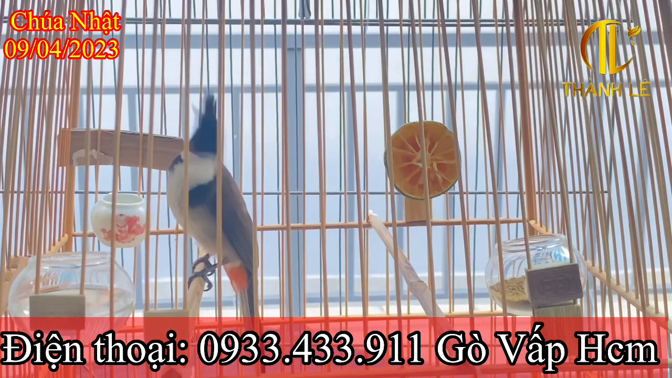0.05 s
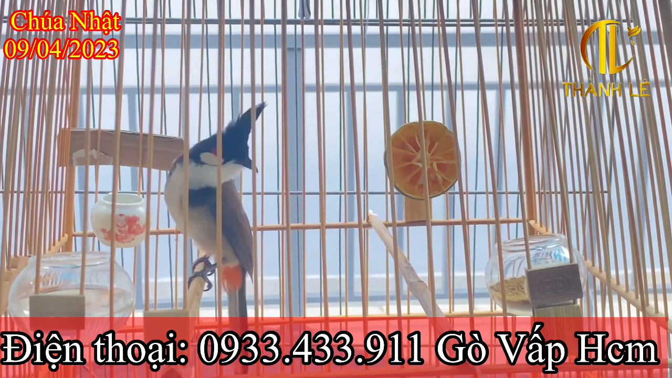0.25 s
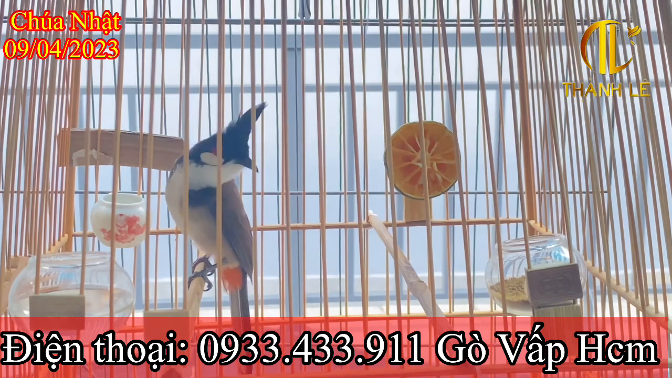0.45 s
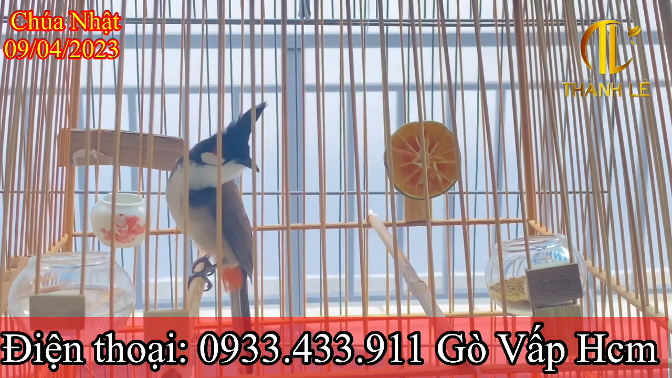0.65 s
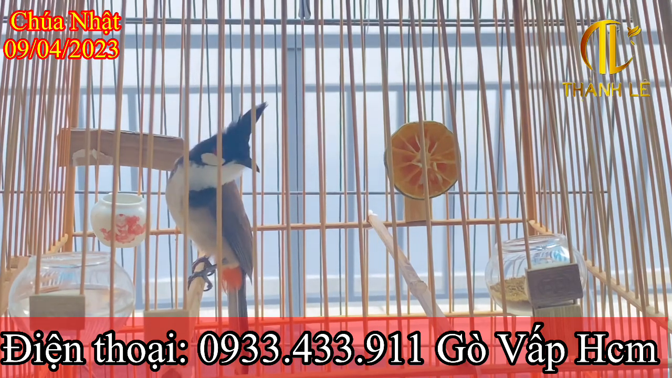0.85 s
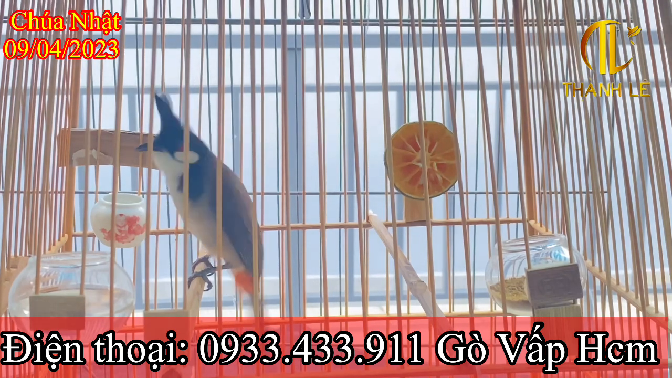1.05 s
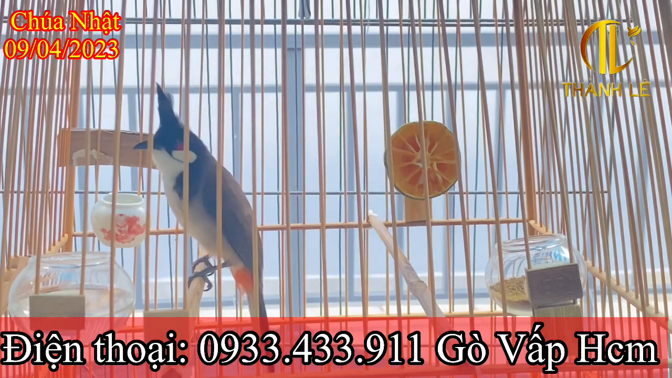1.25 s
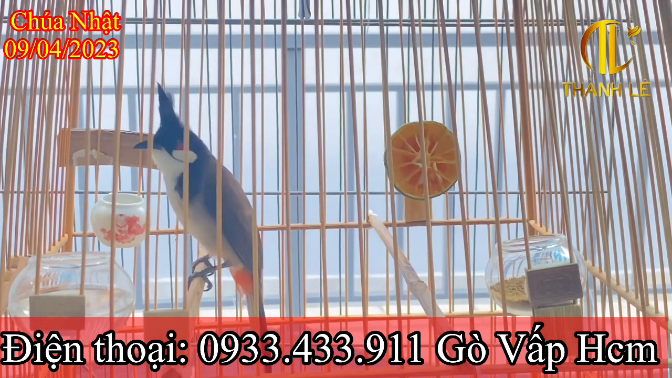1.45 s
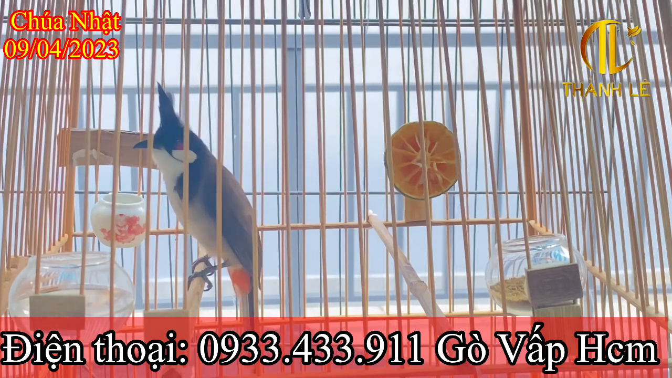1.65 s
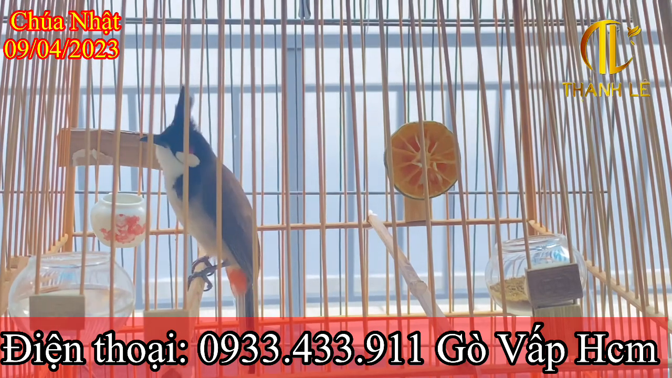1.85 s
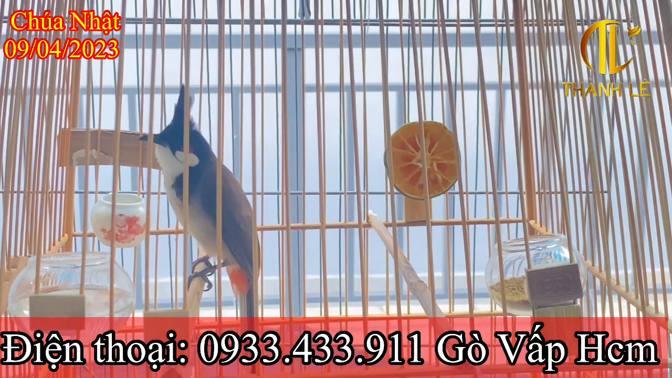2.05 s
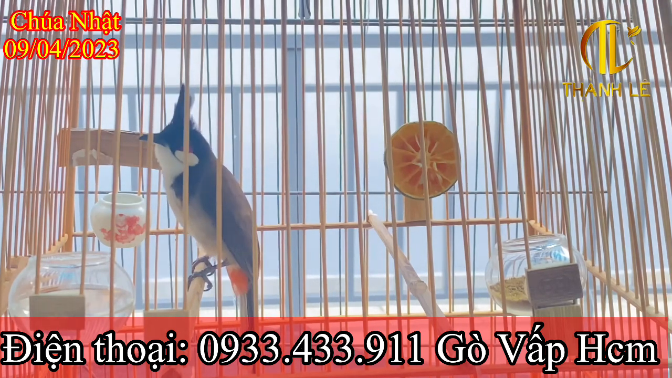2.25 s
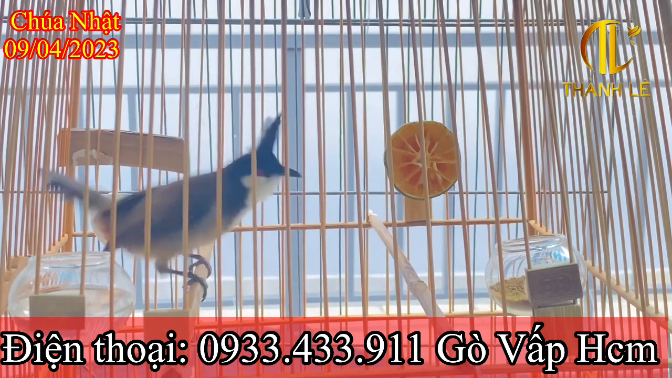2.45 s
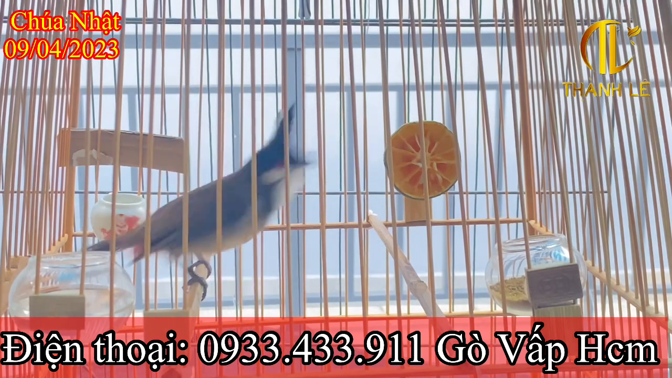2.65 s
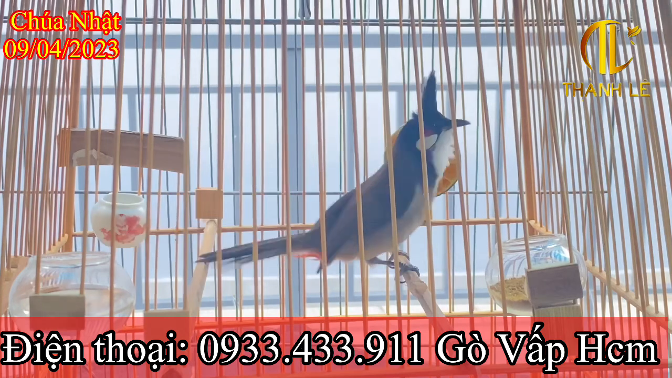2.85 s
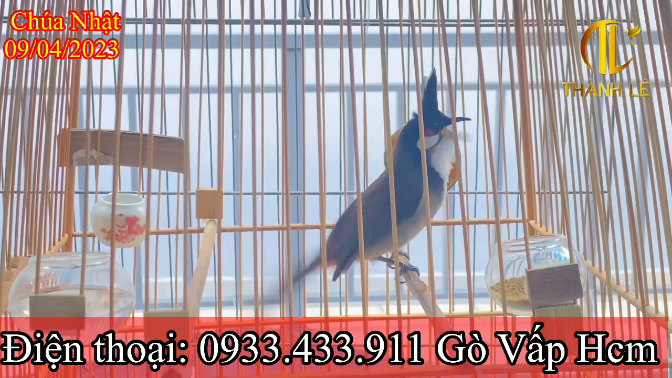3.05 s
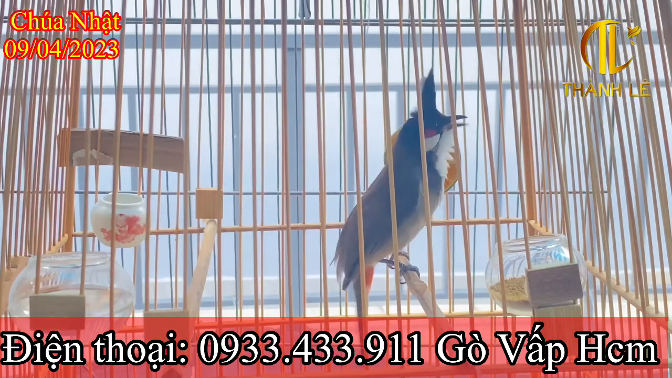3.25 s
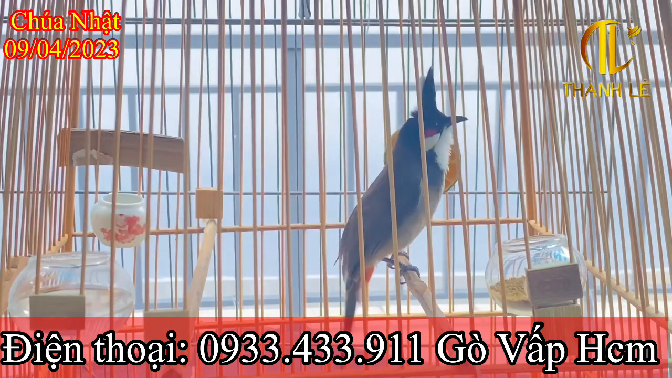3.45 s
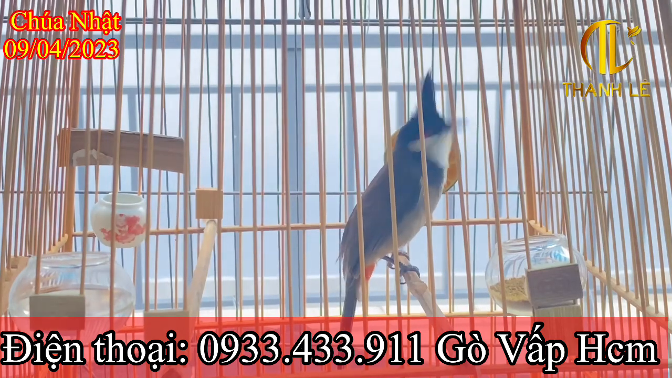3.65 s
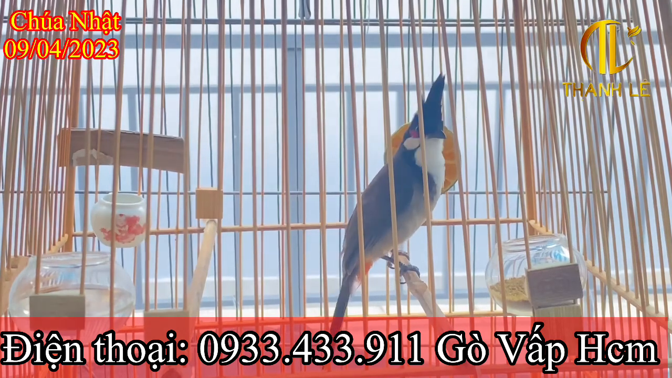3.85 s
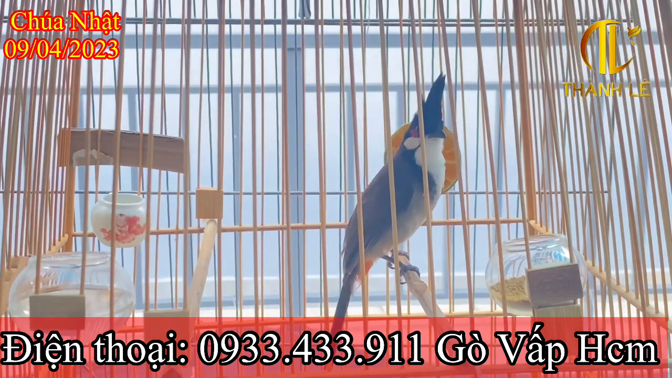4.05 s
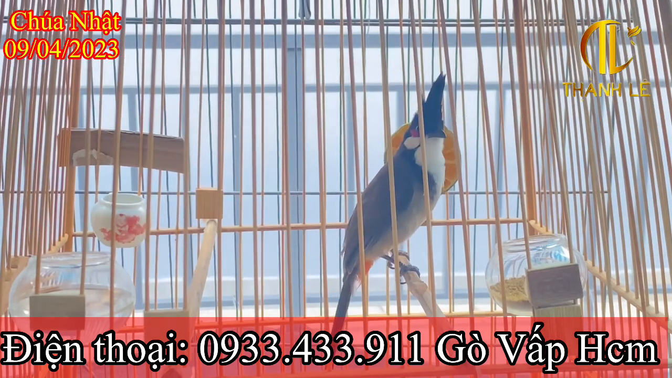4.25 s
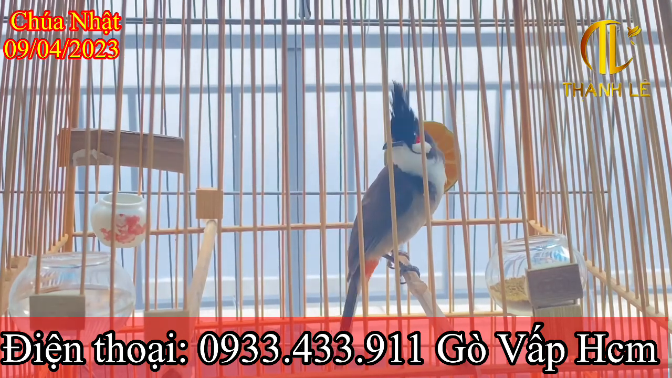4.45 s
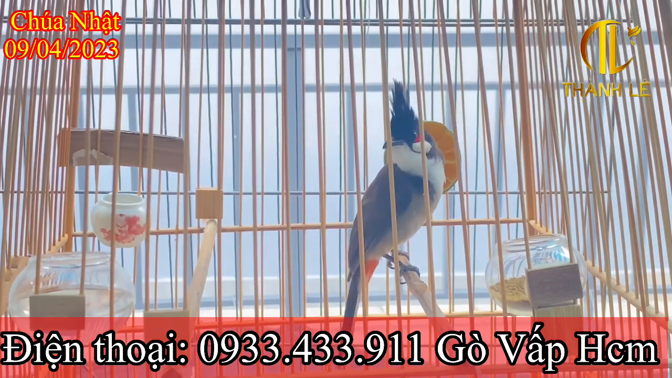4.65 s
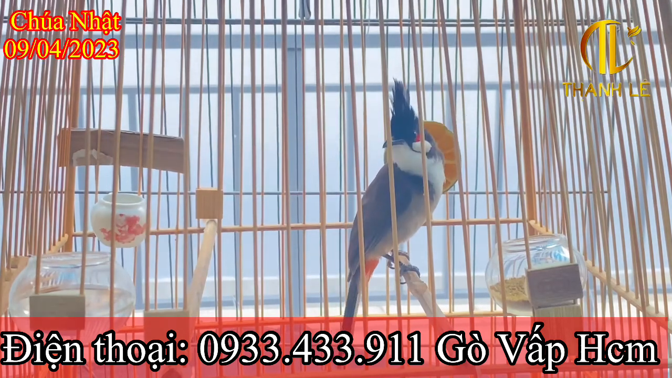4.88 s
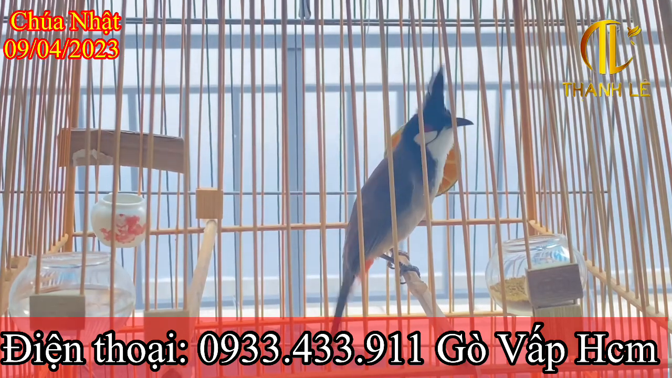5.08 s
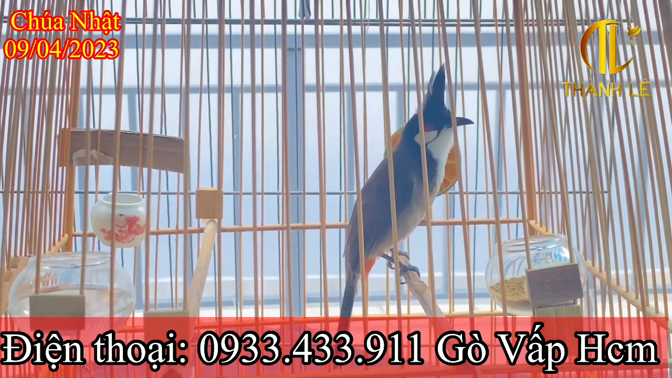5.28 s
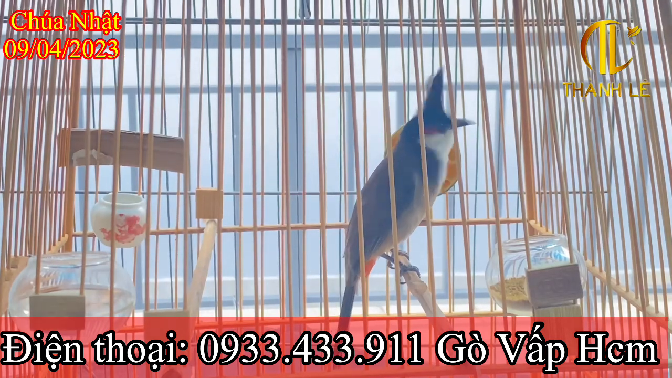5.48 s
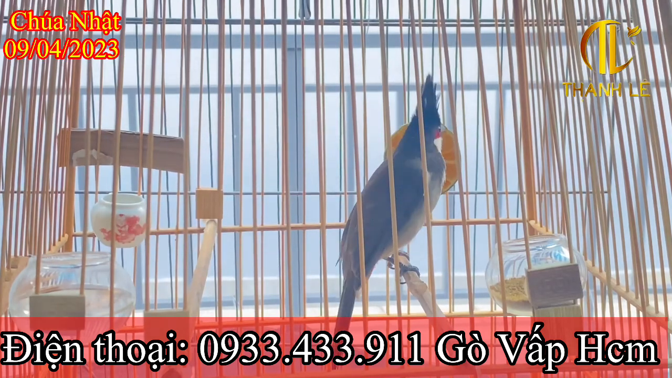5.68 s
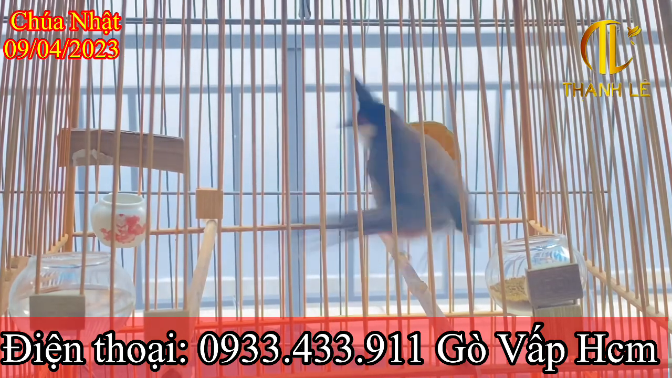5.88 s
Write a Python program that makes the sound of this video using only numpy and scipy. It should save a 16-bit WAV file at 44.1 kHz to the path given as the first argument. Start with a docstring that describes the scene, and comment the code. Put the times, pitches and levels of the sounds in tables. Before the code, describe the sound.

Three bright bird phrases, each under a second, stand out from a quiet room. Rising shaken notes open, stepped whistles with a loud sharp note follow, and rapid rising and arching trills close. Another bird pips softly and others chirp far off. Low dull knocks and brief thrums follow the middle phrase, over wavering hum, rumble and faint fluctuating high hiss, closely miked in stereo.

```python
"""Three bright phrases from a caged red-whiskered bulbul, close to the microphone in a quiet room.
Its syllables are gliding whistles, some shaken by a fast trill, with fluttering overtones and breath noise.
Another bird's soft pips and far wavering chirps are sine glides with an octave; echoes and a room tail follow.
Beneath lie knocks of fading band noise, two buzzing thrums, a wavering hum and rumble.
Over all lies a thin high hiss of shaped noise, stronger in some stretches."""
import sys
import numpy as np
from scipy import signal
from scipy.fft import rfft, irfft
from scipy.io import wavfile

SR = 44100
rng = np.random.default_rng(int(sys.argv[2]) if len(sys.argv) > 2 else 0)


def wav_out(sig):
    """Save sig, one row per channel (or a flat mono array), as 16-bit PCM at SR to the path in sys.argv[1]."""
    wavfile.write(sys.argv[1], SR, np.round(np.clip(np.atleast_2d(sig).T, -1, 1) * 32767).astype(np.int16))


N = 261072
TIME = np.arange(N) / SR  # seconds
CUTOFF_HZ = 15900

# Rising trilled notes. Each row: start in seconds, length in seconds, start pitch in Hz, top pitch in Hz,
# share of the length until the rise is 63% done, suddenness as a power, level in dB, swell in dB,
# trills per second at the start, at the top, half pitch swing of the trill at the top in Hz, overtones in dB.
WHITS = [(0.43, 0.06, 2045, 3468, 0.44, 1.7, -14, 15, 190, 195, 40, -4.5),
         (3.043, 0.056, 1850, 3311, 0.55, 3.19, -6, 17, 175, 76, 250, 3),
         (4.374, .068, 2146, 3247, .39, 2.1, -16, 16, 198, 195, 25, 0),
         (4.701, .042, 2545, 3562, .5, 1.52, -12.5, 10, 94, 97.2, 463, 3.5)]
WHIT_DEPTH_HZ, WHIT_STEADY_POWER, WHIT_ATTACK_S = 600, 2.5, 0.005

# Trilled notes that rise and fall. Each row: start in seconds, length in seconds, start pitch in Hz,
# top pitch in Hz, end pitch in Hz, share of the length before the top, level at the top in dB,
# trills per second at the ends, at the top, half pitch swing of the trill in Hz, overtones in dB.
ARCHES = [(0.554, 0.11, 2420, 3220, 2450, .49, -22.5, 118, 105, 346, -4),
          (4.506, .124, 2180, 3200, 2400, .45, -18, 128, 95, 432, 2),
          (4.828, .094, 2720, 3120, 2580, .37, -16, 104, 100, 294.4, -1)]
ARCH_SWELL_DB, ARCH_POINT_POWER, ARCH_ATTACK_S, TRILL_RASP_HZ = 7.5, 1.4, 0.0037, 62

# Held whistles, slurred into steps. Each row: start in seconds, length in seconds, start pitch in Hz,
# end pitch in Hz, level before rounding in dB at the start, at the end, rasp in Hz, overtones in dB.
WHISTLES = [(2.71, .009, 2400, 1850, -38, -34, 330, 9), (2.718, .035, 1760, 1640, -30, -21.5, 35, 7.5),
            (2.754, .024, 1930, 2200, -29, -23.5, 150, 9), (2.775, .031, 2230, 2190, -21, -21.5, 110, 8),
            (2.806, .020, 2170, 2280, -28.5, -31.5, 35, 4.5),
            (2.923, .013, 1400, 1440, -30.5, -24.5, 25, 5), (2.933, .030, 1950, 1975, -25, -26.5, 20, 4),
            (2.961, .037, 1865, 1815, -17, -20.5, 25, 2.5), (3.198, .025, 3000, 2890, -13.5, -10.5, 20, 2),
            (3.252, .019, 2250, 2060, -21.5, -27.5, 110, 3.5), (3.276, .018, 2400, 2330, -15.5, -19, 60, 0),
            (3.295, .024, 2700, 2570, -16.5, -14, 40, -2), (3.322, .026, 2660, 2600, -14, -16.5, 30, -0.5),
            (3.353, .025, 2000, 1930, -26, -25, 45, 4.5), (3.383, .026, 1900, 1640, -24, -21, 35, -1),
            (3.406, .032, 1640, 1480, -22.5, -29, 25, -1.5)]
WHISTLE_SWELL_DB, QUAVER_PER_S, QUAVER_HZ = 2.5, 310, 34.8

# Quick falls that lead into a note or join two steps.
# Each row: start in seconds, top pitch in Hz, level at mid-note in dB.
FLICKS = [(.546, 2320, -28.5), (2.636, 1630, -35), (2.646, 2396, -27.5), (3.194, 3678, -16),
          (3.270, 2732, -17), (3.315, 3060, -17), (3.376, 2480, -18.5), (4.495, 2416, -35),
          (4.803, 2400, -31), (4.811, 2726, -25), (4.819, 2550, -22.5)]
FLICK_S, FLICK_FALL, FLICK_RASP_HZ, FLICK_SWELL_DB = 0.0093, .2, 30, 6.5

# How the throat passes the fundamental. Each row: frequency in Hz, gain in dB.
THROAT = [(1400, -3.5), (2000, 1), (2600, -1), (3200, -0.74), (3550, -3), (3850, -4.5), (4200, -8.5),
          (5000, -15)]
# Overtone resonances of throat and beak. Each row: frequency in Hz, gain against the fundamental in dB.
OVERTONES = [(3000, -24), (4500, -33), (6300, -36.5), (8000, -39), (9500, -43.5), (11500, -34.5),
             (12400, -37.5), (13500, -57.5), (14700, -38.5), (16000, -40.5)]
# How far the head faces the microphone, heard in the beamed top treble.
# Each row: time in seconds, treble gain in dB.
FACING = [(.5, -12), (2.75, -12.5), (2.95, 7), (3.4, 7), (4.4, -5.5), (4.9, -12)]

# Soft pips. Each row: middle in seconds, top pitch in Hz, level in dB, octave in dB.
PIPS = [(0.278, 1604, -49, -10.5), (0.782, 1540, -49.5, -11), (1.644, 1700, -43, -3),
        (1.787, 1717, -42.5, -0.5), (2.396, 1647, -41.5, -4.5), (4.59, 1568, -45, 9.5),
        (4.751, 1577, -45, 1.5), (4.977, 1641, -41.5, -9), (4.999, 1718, -43, -27),
        (5.603, 1528, -50.5, -8.5), (5.893, 1680, -47, -6.5)]

# Far thin whistles and chirps. Each row: start in seconds, length in seconds, start pitch in Hz,
# end pitch in Hz, level before distance in dB, waver as a share of the pitch.
FAR_CHIRPS = [(.83, .094, 4100, 4300, -69, .025), (1.07, .07, 5300, 4700, -63.5, .08),
              (1.53, .23, 3750, 3700, -64, .015), (1.667, .08, 4280, 4350, -65, .015),
              (1.84, .2, 3500, 3390, -69.5, .02), (2.07, .08, 4200, 4500, -70, .03),
              (2.43, .06, 5400, 4500, -65, .06), (2.48, .18, 3550, 3360, -67, .022),
              (3.715, .06, 5900, 4600, -61, .07)]
# One far low toot: start in seconds, length in seconds, start pitch in Hz, end pitch in Hz,
# level before distance in dB, waver as a share of the pitch.
TOOT = (4.5, 0.28, 301, 293.5, -49, 0.04)
FAR_OCTAVE_DB = -27
# A far husky call, given twice. Each row: start in seconds, level before distance in dB.
HUSKY_CALLS = [(1.47, -47.5), (5.422, -47.5)]
HUSKY_S, HUSKY_HZ, HUSKY_WAVER, HUSKY_OCTAVE_DB = 0.064, 1920, 0.107, -9

# Close surfaces. Each row: delay in seconds, level in dB, left-over-right balance in dB.
ECHOES = [(.0021, -27.5, 8), (.0047, -19.5, 12.5), (.0083, -13, 1), (0.0134, -16.5, 4), (.021, -17.5, -0.5)]
# Phase by which the left microphone port leads. Each row: frequency in Hz, lead in radians.
PORT_PHASE = [(800, 0.5), (1500, 0.24), (2000, -0.17), (2600, 0.52), (3200, 0.7), (4200, 0.6), (6000, 0.14),
              (8800, 1.78), (11300, -0.5), (12800, -3), (15000, -1.5)]

# Soft knocks. Each row: start in seconds, centre in Hz, level in dB, time to fall 60 dB in seconds.
KNOCKS = [(1.001, 3250, -46.5, 0.016), (2.94, 900, -55, 0.55), (3.02, 600, -53.5, 0.54),
          (3.425, 610, -49, 1), (5.129, 480, -50, 0.52), (5.179, 376, -49.5, 0.47)]
# Two low thrums. Each row: start in seconds, length in seconds, level in dB.
THRUMS = [(3.516, 0.13, -38), (3.926, 0.15, -36)]
# Partials of a thrum. Each row: multiple of the base pitch, level in dB.
THRUM_PARTIALS = [(2, -2.5), (3, -13.5)]

# Shape of the rumble. Each row: frequency in Hz, relative density in dB per Hz.
RUMBLE = [(20, -36), (40, -14), (58, -3), (78, -9), (115, -3), (160, -6), (200, -8), (300, -12), (600, -20),
          (1100, -27), (2400, -32), (4500, -41), (9000, -53), (16000, -63)]
RUMBLE_DB = -51.5
# How alike left and right are in the rumble. Each row: frequency in Hz, likeness from 0 to 1.
LIKENESS = [(60, .92), (200, 0.89), (500, 0.59), (1000, .3), (3000, 1), (9000, .5)]
# Shape of the thin high hiss. Each row: frequency in Hz, relative density in dB per Hz.
HISS_SHAPE = [(2000, -11), (4500, -1), (7000, 2.5), (9000, -2), (12000, 0), (13400, -14), (14800, -1),
              (16000, 1)]
# Stretches of stronger hiss. Each row: start in seconds, end in seconds, level added over the rest in dB.
STRONGER_HISS = [(1.099, 1.909, -73), (2.1, 4.15, -72.5), (5.094, 5.666, -70.5), (5.78, 6.0, -70)]
HISS_REST_DB, HISS_FADE_S = -89, .08


def from_db(db):
    """Decibels to gain."""
    return 10 ** (np.asarray(db) / 20)


def rms_one(x):
    """Scale to unit rms."""
    return x / np.sqrt(np.mean(x ** 2) + 1e-20)


def at_hz(points, hz):
    """Read a curve on a log-frequency axis."""
    f, value = np.transpose(points)
    return np.interp(np.log(np.maximum(hz, 1)), np.log(f), value)


def coloured(spectrum, count=2):
    """Independent noises of the given spectrum, at unit rms overall."""
    hz = np.arange(N // 2 + 1) * SR / N
    white = rfft(rng.standard_normal((count, N)))
    return rms_one(irfft(white * from_db(at_hz(spectrum, hz)), N))


def wander(size, per_s):
    """Smooth random drift of about unit spread."""
    sos = signal.butter(2, min(per_s, SR / 4), fs=SR, output="sos")
    # the extra eighth of a second lets the filter settle
    return rms_one(signal.sosfilt(sos, rng.standard_normal(size + SR // 8)))[-size:]


def band(x, low_hz, high_hz):
    """Gentle band-pass."""
    edges = [low_hz, min(high_hz, SR / 2 - 1)]
    return signal.sosfilt(signal.butter(2, edges, "band", fs=SR, output="sos"), x)


def stereo(pair, alike):
    """Two unrelated signals become left and right with the given likeness."""
    alike = np.clip(alike, 0, 1)
    middle = np.sqrt(1 + alike) * pair[0]
    side = np.sqrt(1 - alike) * pair[1] * np.array([[1], [-1]])
    return (middle + side) / np.sqrt(2)


def add(track, start_s, sound):
    """Mix a sound in at its moment."""
    i = max(int(start_s * SR), 0)
    track[..., i:i + sound.shape[-1]] += sound[..., :max(N - i, 0)]


def turn(hz):
    """Running phase of a changing frequency."""
    return 2 * np.pi * np.cumsum(hz) / SR


def progress(length_s):
    """Runs from 0 to 1 over a note."""
    return np.linspace(0, 1, int(length_s * SR))


def eased_in(note, attack_s):
    """The note builds up from silence."""
    return note * (1 - np.exp(-TIME[:len(note)] / attack_s))


def bulbul():
    """The four kinds of note that make up the song."""
    return whits() + arches() + whistles() + flicks()


def syllable(s, pitch, level_db, trill_per_s, depth, rasp_hz, beak_db, rasp_per_s=450, air_db=-40,
             flutter_db=2.5, arch_mean=.58, trill_shut_db=16, edge_s=.0025, uneven=.2):
    """The syrinx whistles; the trill strings little pitch arches together and nearly shuts it between them."""
    size = len(pitch)
    bins = np.fft.rfftfreq(size, 1 / SR)
    arch = abs(np.sin(turn(trill_per_s * np.ones(size)) / 2))
    # no two arches are equally wide
    depth = depth * (1 + uneven * wander(size, 130))
    hz = pitch + 2 * depth * (arch - arch_mean) + rasp_hz * wander(size, rasp_per_s)
    phase = turn(hz)

    # deep trills close furthest
    shut = np.clip(depth / 260, 0, 1) * ((1 - arch) ** 2 - .1)
    edges = signal.windows.tukey(size, min(1, 2 * edge_s * SR / size))
    envelope = edges * from_db(level_db - trill_shut_db * shut)
    whistle = irfft(rfft(envelope * np.sin(phase)) * from_db(at_hz(THROAT, bins)), size)

    # each overtone flutters on its own as it passes the resonances of throat and beak
    upper = np.zeros(size)
    for k in range(2, 9):
        overtone_db = at_hz(OVERTONES, k * hz) - .6 * (k - 1.5) + flutter_db * wander(size, 150)
        upper += from_db(overtone_db) * (k * hz < CUTOFF_HZ) * np.sin(k * phase)

    # air rushes through the same resonances, stronger in the raspy syllables
    rush = irfft(rfft(rng.standard_normal(size)) * from_db(at_hz(OVERTONES, bins)), size)
    air = from_db(air_db) * np.sqrt(abs(rasp_hz) / 60) * rms_one(band(rush, 3800, 16000))

    # the beamed top treble weakens when the head is turned away
    facing_db = np.interp(s, *np.transpose(FACING))
    colour_db = beak_db + facing_db * np.clip((bins - 7000) / 7000, 0, 1)
    return whistle + irfft(rfft(envelope * (upper + air)) * from_db(colour_db), size)


def whits():
    """Effort climbs and levels off: pitch and loudness rise with it while the trill narrows."""
    out = np.zeros(N)
    for (s, length_s, start_hz, top_hz, rise_share, suddenness, level_db, swell_db,
         start_rate, top_rate, top_depth_hz, beak_db) in WHITS:
        effort = 1 - np.exp(-(progress(length_s) / rise_share) ** suddenness)
        pitch = start_hz + (top_hz - start_hz) * effort
        rate = start_rate + (top_rate - start_rate) * effort
        depth = WHIT_DEPTH_HZ + (top_depth_hz - WHIT_DEPTH_HZ) * effort ** WHIT_STEADY_POWER
        loudness_db = level_db - swell_db * (1 - effort)
        note = syllable(s, pitch, loudness_db, rate, depth, TRILL_RASP_HZ, beak_db)
        add(out, s, eased_in(note, WHIT_ATTACK_S))
    return out


def arches():
    """Effort rises to a point and falls: the note is highest, loudest and slowest in its trill there."""
    out = np.zeros(N)
    for (s, length_s, start_hz, top_hz, end_hz, top_share, level_db,
         end_rate, top_rate, depth_hz, beak_db) in ARCHES:
        u = progress(length_s)
        effort = np.interp(u, [0, top_share, 1], [0, 1, 0]) ** ARCH_POINT_POWER
        foot_hz = np.where(u < top_share, start_hz, end_hz)
        pitch = foot_hz + (top_hz - foot_hz) * effort
        rate = end_rate + (top_rate - end_rate) * effort
        loudness_db = level_db - ARCH_SWELL_DB * (1 - effort)
        note = syllable(s, pitch, loudness_db, rate, depth_hz, TRILL_RASP_HZ, beak_db)
        add(out, s, eased_in(note, ARCH_ATTACK_S))
    return out


def whistles():
    """Straight glides with a slight fast quaver; each grows or fades, rounded at its ends."""
    out = np.zeros(N)
    for s, length_s, start_hz, end_hz, start_db, end_db, rasp_hz, beak_db in WHISTLES:
        u = progress(length_s)
        pitch = start_hz + (end_hz - start_hz) * u
        level_db = start_db + (end_db - start_db) * u - WHISTLE_SWELL_DB * (2 * u - 1) ** 2
        add(out, s, syllable(s, pitch, level_db, QUAVER_PER_S, QUAVER_HZ, rasp_hz, beak_db))
    return out


def flicks(beak_db=1):
    """The pitch drops by a fixed share in about a hundredth of a second, with no trill."""
    out, u = np.zeros(N), progress(FLICK_S)
    for s, top_hz, level_db in FLICKS:
        pitch = top_hz * (1 - FLICK_FALL * u ** 2)
        swell_db = level_db - FLICK_SWELL_DB * (2 * u - 1) ** 2
        add(out, s, syllable(s, pitch, swell_db, 0, 0, FLICK_RASP_HZ, beak_db))
    return out


def pips(length_s=.053, wobble_per_s=50, fall=0.096, third_db=-17, fourth_db=-25, uneven=0.093):
    """A quiet note: the pitch dips, arches and dips again, never quite alike, with an octave above."""
    out = np.zeros(N)
    t = np.arange(-length_s / 2, length_s / 2, 1 / SR)
    for s, top_hz, level_db, octave_db in PIPS:
        wobble = wobble_per_s * (1 + uneven * rng.standard_normal())
        arch = np.cos(2 * np.pi * wobble * t) - 1 - (t / length_s) ** 2 * 1.6
        phase = turn(top_hz * (1 + fall * arch + 0.0075 * wander(len(t), 300)))
        # third and fourth partials are set against the octave
        upper = np.sin(2 * phase) + from_db(third_db) * np.sin(3 * phase)
        upper += from_db(fourth_db) * np.sin(4 * phase)
        tone = np.sin(phase) + from_db(octave_db + 3.2 * wander(len(t), 130)) * upper
        add(out, s - length_s / 2, from_db(level_db) * signal.windows.tukey(len(t), .7) * tone)
    return out


def far_sounds():
    """Thin whistles, husky calls and a toot from further off."""
    out = np.zeros(N)
    for s, *note in [*FAR_CHIRPS, TOOT]:
        add(out, s, far_note(*note, FAR_OCTAVE_DB))
    for s, level_db in HUSKY_CALLS:
        add(out, s, far_note(HUSKY_S, HUSKY_HZ, HUSKY_HZ, level_db, HUSKY_WAVER, HUSKY_OCTAVE_DB))
    return out


def far_note(length_s, start_hz, end_hz, level_db, waver, octave_db):
    """A soft-edged wavering glide with its octave."""
    size = int(length_s * SR)
    phase = turn(np.linspace(start_hz, end_hz, size) * (1 + waver * wander(size, 200)))
    tone = np.sin(phase) + from_db(octave_db) * np.sin(2 * phase)
    return from_db(level_db) * signal.windows.tukey(size, .5) * tone


def close_echoes(x):
    """Short reflections beat against the trills and break them into beads."""
    out = np.array([x, x])
    for delay_s, level_db, pan_db in ECHOES:
        add(out, delay_s, x * from_db(level_db + pan_db * np.array([[.5], [-.5]])))
    return out


def room(x, early_db=-17, early_t60=0.56, late_db=-23, late_t60=0.64, treble_db=-7, alike=0.97):
    """Dense early reflections, then a weaker, longer tail; the treble is absorbed."""
    t = TIME[:SR]
    noise = stereo(rng.standard_normal((2, SR)), alike)
    onset = np.clip((t - .004) / .008, 0, 1)
    power = np.zeros(SR)
    for db, t60 in [(early_db, early_t60), (late_db, late_t60)]:
        # the last factor makes the energy of each decay follow its level
        power += from_db(db - 60 * t / t60) ** 2 * np.log(1e6) / (t60 * SR)
    dull = signal.sosfilt(signal.butter(2, 4200, fs=SR, output="sos"), noise)
    response = (dull + from_db(treble_db) * (noise - dull)) * onset * np.sqrt(power)
    return signal.fftconvolve(x[None], response, axes=1)[:, :N]


def microphone_pair(x):
    """A frequency-dependent phase lead parts the two ports, most widely in the treble."""
    angle = at_hz(PORT_PHASE, np.arange(N // 2 + 1) * SR / N)
    return irfft(rfft(x) * np.exp(1j * angle * np.array([[.5], [-.5]])), N)


def knocks(width=1.25):
    """Bumps of band noise, each fading at its own rate."""
    out, t = np.zeros((2, N)), TIME[:SR]
    for s, hz, level_db, t60 in KNOCKS:
        spread = max(width, 1.05)
        body = rms_one(band(rng.standard_normal((2, SR)), hz / spread, hz * spread))
        attack = 1 - np.exp(-t / 0.0017)
        add(out, s, stereo(body, .4) * from_db(level_db - 60 * t / t60) * attack)
    return out


def thrums(start_hz=59, end_hz=68, rattle_db=-12, pan_db=3.5):
    """Something vibrates briefly, speeding up a little and rustling on each cycle."""
    out = np.zeros(N)
    for s, length_s, level_db in THRUMS:
        size = int(length_s * SR)
        phase = turn(np.linspace(start_hz, end_hz, size))
        buzz = sum(from_db(db) * np.cos(k * phase) for k, db in THRUM_PARTIALS)
        rustle = rms_one(band(rng.standard_normal(size), 179, 443))
        rattle = from_db(rattle_db) * rustle * (1 + np.cos(phase)) / 2
        add(out, s, from_db(level_db) * signal.windows.tukey(size, .6) * (buzz + rattle))
    return out * from_db(pan_db * np.array([[-.5], [.5]]))


def room_tone(hum_hz=56.5, hum_db=-53, hum_width_hz=2.5, bass_pan_db=2.0):
    """A hum wavering in pitch and level, and rumble from outside."""
    hz = np.arange(N // 2 + 1) * SR / N
    right_lean = np.array([[-.5], [.5]])
    pan = from_db(bass_pan_db / (1 + (hz / 300) ** 2) * right_lean)
    rumble_spectrum = stereo(rfft(coloured(RUMBLE)), at_hz(LIKENESS, hz)) * pan
    rumble = from_db(RUMBLE_DB) * irfft(rumble_spectrum, N)

    hum_tone = np.sqrt(2) * np.sin(turn(hum_hz + hum_width_hz * wander(N, 4.4)))
    hum = hum_tone * from_db(hum_db + 2.6 * wander(N, 4)) * from_db(bass_pan_db * right_lean)
    return rumble + hum


def high_hiss(flicker_db=3.5):
    """A thin hiss of shaped noise, stronger in some stretches; it is no part of the room's sound."""
    gain = from_db(HISS_REST_DB)
    for start_s, end_s, db in STRONGER_HISS:
        stretch = np.clip(np.minimum(TIME - start_s, end_s - TIME) / HISS_FADE_S, 0, 1)
        gain = gain + from_db(db) * stretch
    return stereo(coloured(HISS_SHAPE), 0.9) * gain * from_db(flicker_db * wander(N, 18))


def scene(pip_room_db=3, far_direct_db=-4, far_room_db=12):
    """The close bird, soft pips and far sounds in the room, over knocks, thrums, room tone and hiss."""
    near, soft, far = bulbul(), pips(), far_sounds()
    direct = close_echoes(near + soft) + from_db(far_direct_db) * far
    # far sounds get a stronger share of the room
    tail = room(near + from_db(pip_room_db) * soft + from_db(far_room_db) * far)
    return microphone_pair(direct + tail) + knocks() + thrums() + room_tone() + high_hiss()


def record(dry):
    """The top is cut steeply."""
    return signal.sosfilt(signal.ellip(12, .1, 80, CUTOFF_HZ, fs=SR, output="sos"), dry)


dry = scene()
out = record(dry)
wav_out(out)
```